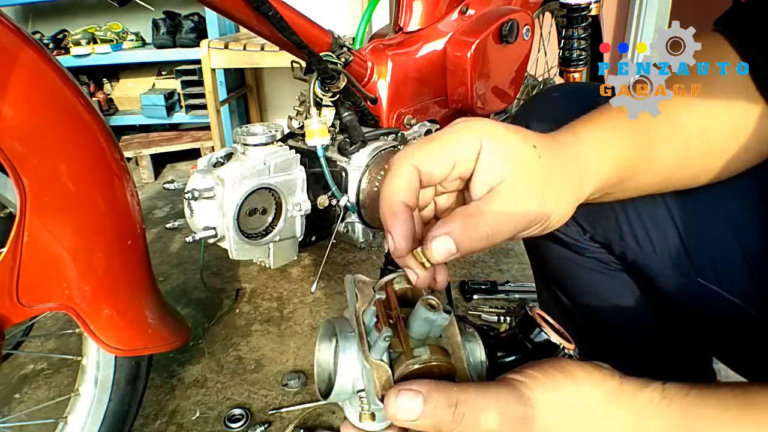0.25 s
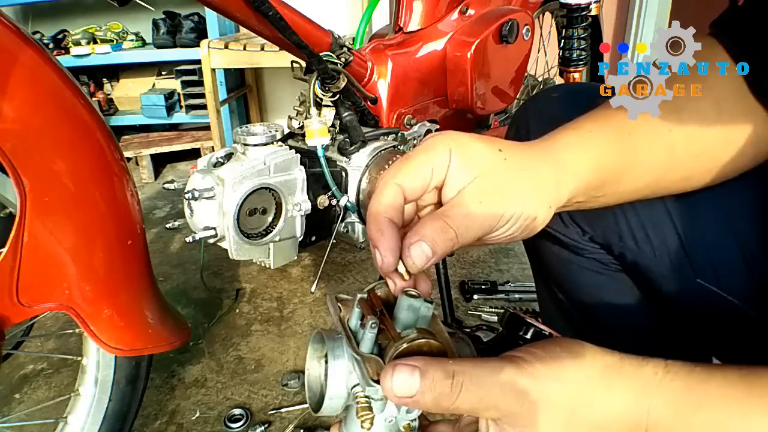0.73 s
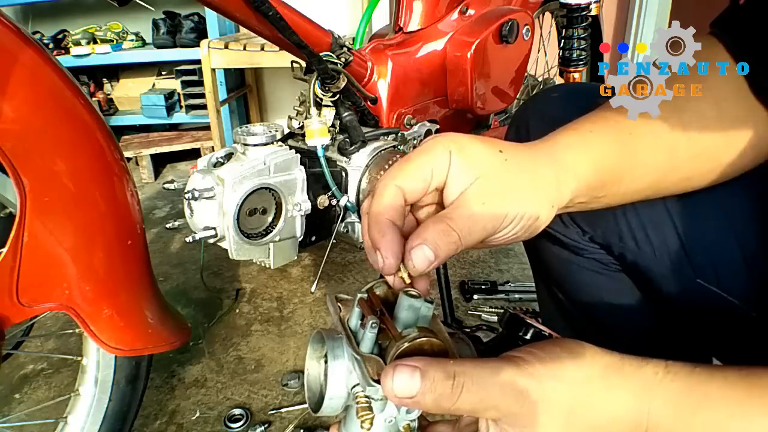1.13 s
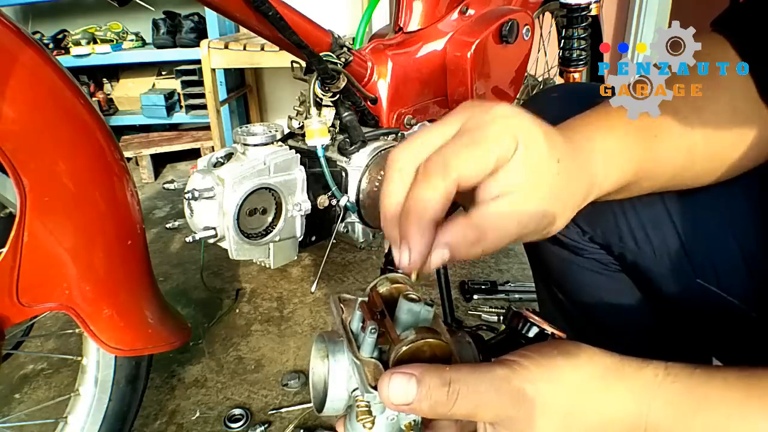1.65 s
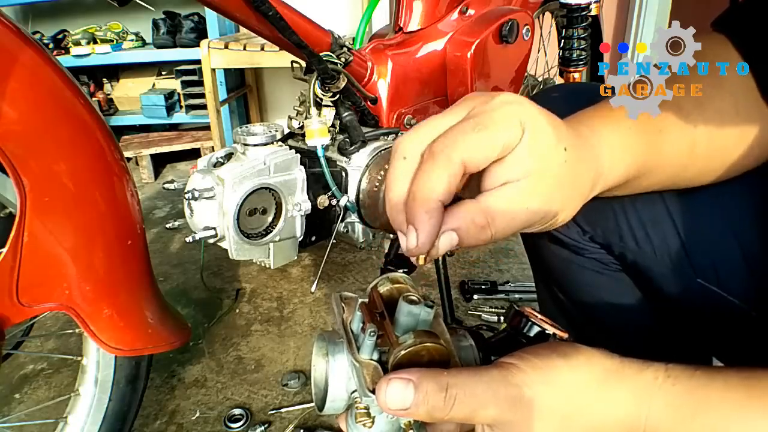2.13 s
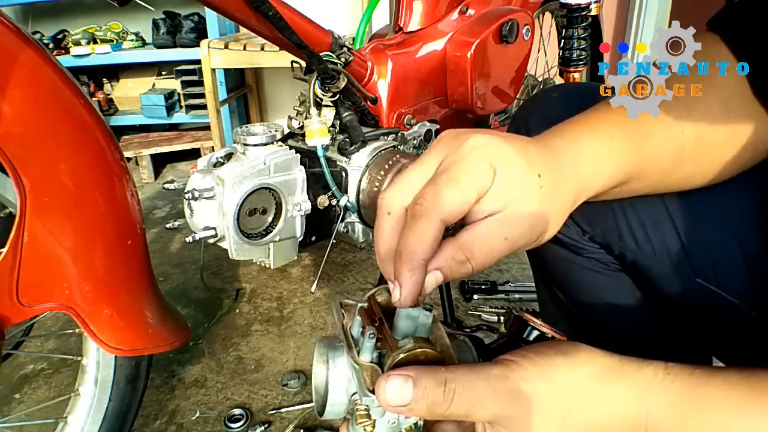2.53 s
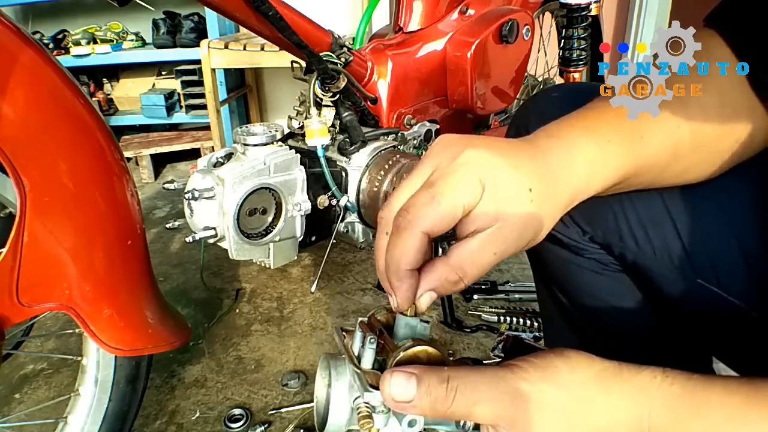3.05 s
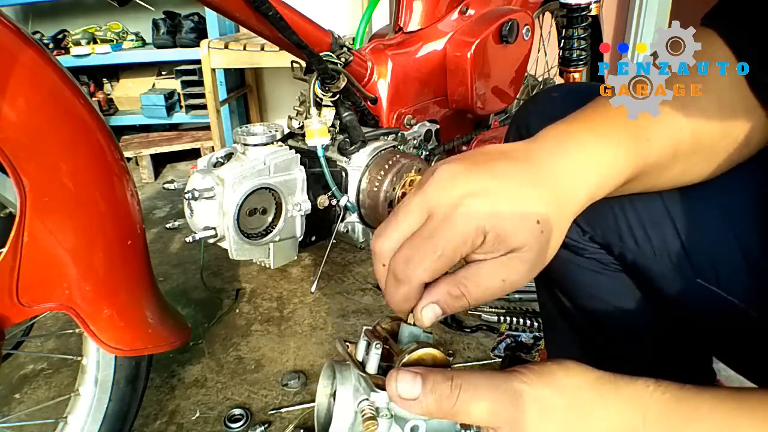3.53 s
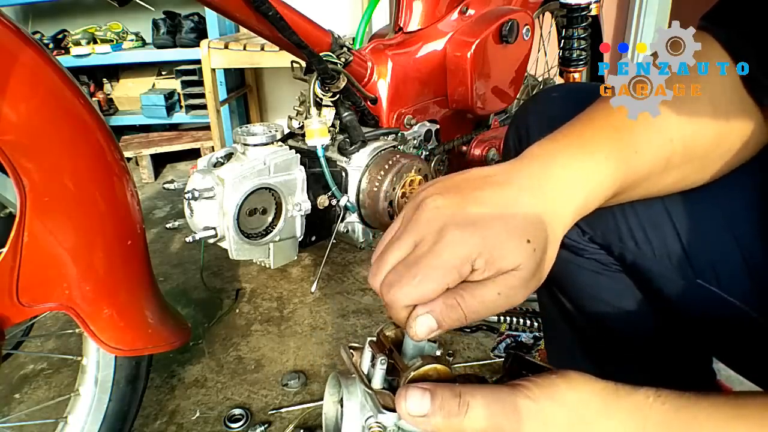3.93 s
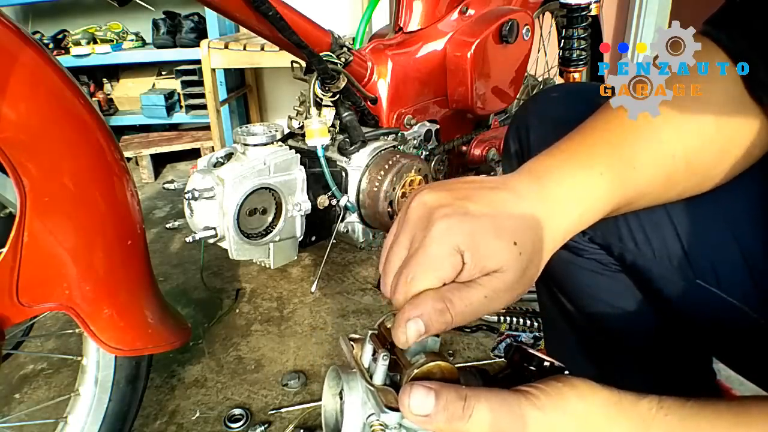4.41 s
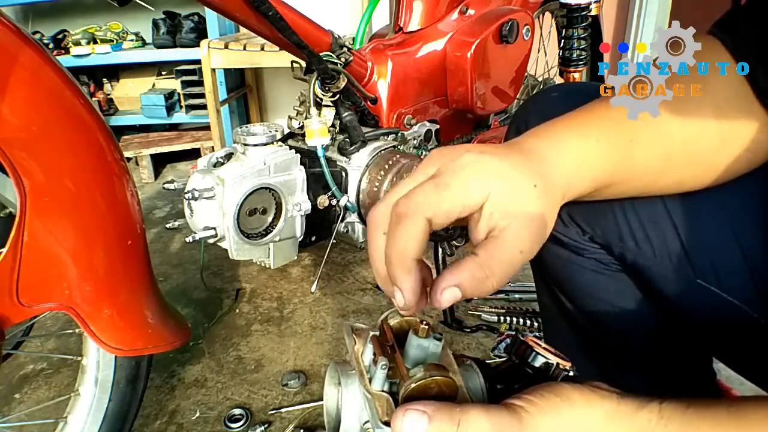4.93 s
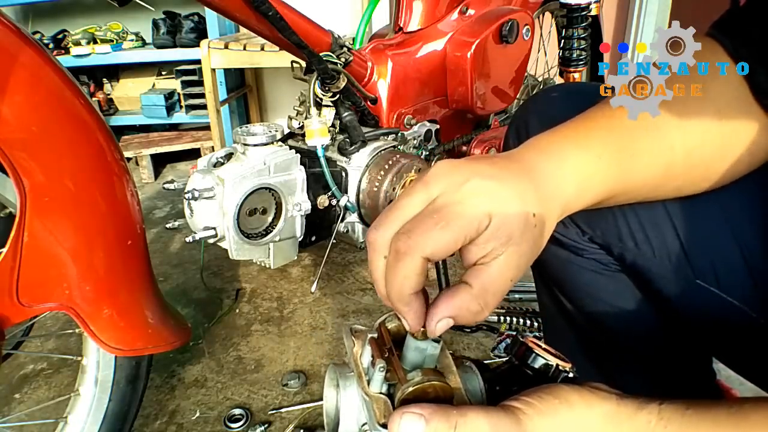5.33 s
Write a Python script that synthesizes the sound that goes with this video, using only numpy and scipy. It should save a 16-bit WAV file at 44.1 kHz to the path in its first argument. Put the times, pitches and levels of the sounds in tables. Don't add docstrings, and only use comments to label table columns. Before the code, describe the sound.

Hands fit small brass and alloy carburetor parts close to a phone in an open workshop. A far hollow clank and light taps begin, then a loud clip clink and rattle, a solid pin click and the hardest ringing clack. Later come sparse ticks and a quick light cluster. Traffic, low drones, a motor and sparrows lie behind, ducked after the first loud clink.

```python
import sys
import numpy as np
from scipy import signal
from scipy.fft import rfft, irfft, next_fast_len
from scipy.io import wavfile
from scipy.ndimage import uniform_filter1d, minimum_filter1d

SR = 44100
rng = np.random.default_rng(int(sys.argv[2]) if len(sys.argv) > 2 else 0)


def voltage_ratio(level):
    return 10 ** (np.asarray(level, float) / 20)


def unload_audio(sound):
    columns = np.transpose(np.atleast_2d(sound))
    steps = np.round(np.clip(columns, -1, 1) * 32767)
    wavfile.write(sys.argv[1], SR, steps.astype(np.int16))


N = 245181
T = np.arange(N) / SR

# (frequency [Hz], left minus right [dB])
PORT_TILT = [(2000, 7.5), (4000, -3.5), (7000, 3), (10000, -10), (12000, -8.5), (15000, 12)]


def unit(x):
    return x / np.sqrt(np.mean(x ** 2))


def on_log(table, hz):
    f, db = np.transpose(table)[:2]
    return np.interp(np.log(np.maximum(hz, 1)), np.log(f), db)


def coloured(table, size, like=0., lean=0.):
    fast = next_fast_len(size)
    hz = np.fft.rfftfreq(fast, 1 / SR)
    inside = (hz >= table[0][0]) & (hz <= table[-1][0])
    mid, left, right = rng.standard_normal((3, fast))
    like = np.clip(like, 0, 1)
    pair = np.sqrt(like) * mid + np.sqrt(1 - like) * np.array([left, right])
    tilt_db = lean * on_log(PORT_TILT, hz) * np.array([[.5], [-.5]])
    spectrum = rfft(pair) * voltage_ratio(on_log(table, hz) + tilt_db) * inside
    return unit(irfft(spectrum, fast)[:, :size])


def walk(rate_hz):
    k = int(SR / rate_hz)
    steps = np.repeat(rng.standard_normal(N // k + 1), k)
    return 1.3 * uniform_filter1d(uniform_filter1d(steps, k), k)[:N]


def wobble(hz, spread):
    return np.sqrt(2) * np.sin(2 * np.pi * np.cumsum(hz * (1 + spread)) / SR)


def crest(s, db, rise_db_per_s, fall_db_per_s):
    return voltage_ratio(db - np.where(T < s, rise_db_per_s * (s - T), fall_db_per_s * (T - s)))


def echo(x, t60_s, db, gap_s, treble_t60_s, thin_hz=100):
    t = T[:SR // 2]
    thin = signal.butter(1, thin_hz, "high", fs=SR, output="sos")
    noise = signal.sosfilt(thin, rng.standard_normal((2, len(t))))
    dull = signal.sosfilt(signal.butter(2, 9000, fs=SR, output="sos"), noise)
    tail = dull * voltage_ratio(-60 * t / t60_s) + (noise - dull) * voltage_ratio(-60 * t / treble_t60_s)
    tail *= np.clip(t / gap_s, 0, 1)
    tail *= voltage_ratio(db) / np.sqrt(np.sum(tail ** 2, axis=1, keepdims=True))
    return x + signal.fftconvolve(x, tail, axes=1)[:, :N]


def street():
    # (frequency [Hz], density [dB per Hz])
    rumble_spectrum = [(12, -52.5), (20, -21.5), (87, 4), (162, -5.5), (196, -2.5), (255, -10),
                       (285, -20.5), (400, -17), (520, -37), (880, -120)]
    # (frequency [Hz], density [dB per Hz])
    wash_spectrum = [(150, -35.5), (250, -15), (279, -6), (308, -8.5), (639, -15), (698, -14.5),
                     (3500, -28.5), (4550, -58), (7700, -120)]
    # (frequency [Hz], density [dB per Hz])
    air_spectrum = [(1180, -37.5), (2000, -10), (2690, -12), (3740, -1.5), (5440, 1.5), (7510, -3.5),
                    (8900, -1), (10000, -1), (11300, 1), (13900, -1), (16000, -14.5)]
    # (frequency [Hz], level over the rumble [dB])
    motor_orders = [(93, -7), (143, -9.5), (190, -11.5)]
    # (time [s], swell [dB])
    traffic = [(0, 0), (.12, 9.5), (.28, 6.5), (.48, 0), (.7, 0.5), (.93, 8.5), (1.18, -0.5), (1.39, -1),
               (1.51, 7.5), (1.6, 3), (1.9, -0.5), (2.1, -1.5), (3.0, 1), (3.76, 0), (3.98, 2.5), (4.35, 2),
               (4.7, 4.5), (5.1, 5.5), (5.56, 14.5)]
    rumble_db, wash_db, air_db = -48.5, -55.5, -61.5
    rumble_follows, air_follows = 0.4, 0.5
    duck_s, duck_db, duck_fall_s, air_fall_s = 1.535, -13.5, 0.035, 0.33
    motor_fade_db_per_s = 1.04
    lorry_s, lorry_db, lorry_db_per_s = 5.56, -43, 62

    swell_db = np.interp(T, *np.transpose(traffic))
    after_s = np.maximum(T - duck_s, 0)
    ducked_db = duck_db * np.minimum(after_s / duck_fall_s, 1)
    air_ducked_db = duck_db * np.minimum(after_s / air_fall_s, 1)
    idle = voltage_ratio(rumble_db + rumble_follows * swell_db + ducked_db - motor_fade_db_per_s * after_s)
    rumble = np.hypot(idle, crest(lorry_s, lorry_db, lorry_db_per_s, lorry_db_per_s))
    motor = sum(voltage_ratio(db + 3. * walk(11)) * wobble(hz + 0 * T, 0.025 * walk(9)) for hz, db in motor_orders)
    low = coloured(rumble_spectrum, N, like=0.96) * voltage_ratio(1.4 * walk(11)) + motor
    wash = coloured(wash_spectrum, N, like=0.24) * voltage_ratio(1.3 * walk(11))
    air = coloured(air_spectrum, N, like=0.074) * voltage_ratio(0.73 * walk(5.7))
    wash_gain = voltage_ratio(wash_db + swell_db + ducked_db)
    air_gain = voltage_ratio(air_db + air_follows * swell_db + air_ducked_db)
    return rumble * low + wash_gain * wash + air_gain * air


def drones():
    # (start [s], end [s], pitch [Hz], level [dB])
    passes = [
        (0, 1.385, 421, -59),
        (0, 1.2, 566, -65),
        (0.19, 0.594, 522.5, -62.5),
        (3.376, 3.848, 277.7, -70),
        (4.94, 5.271, 309.7, -66.5),
        (5.045, 5.605, 468.5, -72.5),
        (5.319, 5.599, 983, -73),
        (4.021, 4.145, 750, -77),
    ]
    fade_s = 0.063
    out, swell_db, drift = 0, 4.44 * walk(24.04), 0.01547 * walk(30)
    for start, end, hz, db in passes:
        gate = np.clip(np.minimum(T - start, end - T) / fade_s, 0, 1)
        lag = rng.integers(N)
        out = out + gate * voltage_ratio(db + np.roll(swell_db, lag)) * wobble(hz + 0 * T, np.roll(drift, lag))
    return out


def clank():
    # (time [s], pitch [Hz], level [dB])
    knock_table = [
        (0, 1022, -29),
        (0.082, 1006, -40),
        (0.206, 934, -33.5),
        (0.381, 858, -48.5),
        (0.494, 890, -46),
    ]
    rise_db_per_s, fall_db_per_s = 302, 409
    shake = 0.038 * walk(330)
    knocks = sum(crest(s, db, rise_db_per_s, fall_db_per_s) * wobble(hz + 0 * T, shake)
                 for s, hz, db in knock_table)
    return knocks * voltage_ratio(0.9 * walk(70.0) - 5.5) * voltage_ratio(np.array([[-1.5], [1.5]]))


def contacts(hits, modes, crack, scatter_db, crack_db, low_db, low_hz):
    out, t = np.zeros((2, N + SR)), T[:SR // 5]
    fine_t60_s, fine_db = .12, -26
    ring_freedom = 0.95

    fine_hz = np.linspace(2300, 9000, num=36) + rng.uniform(-80, 80, size=36)
    fine = np.transpose([fine_hz, fine_db + on_log(crack, fine_hz), fine_t60_s + 0 * fine_hz])
    hz, db, t60_s = np.vstack([modes, fine]).T
    probe = np.exp(-2j * np.pi * hz[:, None] * t[:SR // 10])
    lag = rng.uniform(.5, .95, (len(hz), 1)) * np.clip(hz / 4000, 0, 1.1)[:, None]
    turn = np.array([-1, 1])[:, None, None] * lag
    decay = voltage_ratio(-60 * t / np.clip(t60_s, .03, .3)[:, None])
    rings = np.exp(1j * (2 * np.pi * hz[:, None] * t + turn)) * decay
    lean_db = on_log(PORT_TILT, hz) * np.array([[.5], [-.5]])
    low_half = signal.butter(8, 5000, fs=SR, output="sos")
    high_half = signal.butter(8, 5000, "high", fs=SR, output="sos")
    touch = np.sin(np.pi / 2 * np.minimum(t / .0008, 1)) ** 2

    for s, peak_db, pan_db, rel_db, chatter_ms, grip_s in hits:
        i = int(s * SR)
        x = t[:SR // 10] * 1000 / max(chatter_ms, .3)
        swell = x ** 0.47 * np.exp(-x)
        impacts = swell * rng.standard_normal(len(x)) * rng.exponential(size=len(x)) ** 1.6
        push = probe @ impacts / np.linalg.norm(impacts)
        even = np.exp(1j * (2 * np.pi * hz * i / SR - np.angle(push))) / np.clip(np.abs(push), .3, 3)
        mix_db = db + scatter_db * rng.standard_normal((2, len(hz))) + (hz < low_hz) * (rel_db + low_db)
        clear = ((voltage_ratio(mix_db + lean_db) * even)[:, None] @ rings)[:, 0].imag
        clear = clear / np.sqrt(np.sum(voltage_ratio(2 * db))) * voltage_ratio(-60 * ring_freedom * t / grip_s)
        thud = signal.sosfilt(low_half, coloured(crack, len(t), like=0.076, lean=0.91))
        fizz = signal.sosfilt(high_half, coloured(crack, len(t), like=0.076, lean=0.91))
        thud_gain = voltage_ratio(min(rel_db + low_db, 0) + 11.0 - 60 * t / 0.016)
        dense = thud_gain * thud + voltage_ratio(-60 * t / 0.065) * fizz
        body = (clear + voltage_ratio(crack_db - 60 * t / grip_s) * dense) * touch
        sound = signal.fftconvolve(body, impacts[None], axes=1)[:, :len(t)]
        sound *= voltage_ratio(peak_db) / np.abs(sound.mean(axis=0)).max()
        out[:, i:i + len(t)] += sound * voltage_ratio(np.array([[pan_db], [-pan_db]]) / 2)
    return out[:, :N]


def light_taps():
    # (time [s], peak [dB], left minus right [dB], low ring minus peak [dB], chatter [ms])
    lift_taps = [
        (.102, -36.5, 6, -8, 14),
        (.131, -29.5, 0.5, -13, 9.5),
        (.180, -27, 8, 1.5, 3.7),
        (.196, -33, 3, 8, 7.5),
        (.311, -49, 8, 22, 1.46),
        (.357, -31.5, 10, -6, 5),
        (.424, -44.5, 14, -22, 5.1),
        (.598, -53.5, -18.5, -15, 27),
        (.912, -42.5, 0, -30, 25),
    ]
    # (time [s], peak [dB], left minus right [dB], low ring minus peak [dB], chatter [ms])
    turn_taps = [(1.883, -30, 3, -40, 1.5), (2.06, -60.5, -1, -29, 8), (2.70, -47, -1, -18.5, 10.6),
                 (3.338, -54, -2, -25, 3), (3.346, -43, 8.5, -19, 2.24), (3.354, -38, -2, -16, 10.6),
                 (3.381, -29, 4, -17, 1.45), (3.39, -45.5, 3, -7.5, 20), (3.82, -57.5, 6, -30, 15.7),
                 (4.156, -53.5, -15.5, -16, 2.6), (4.283, -56, 13, -26, 1.16), (4.302, -57.5, 6, -26, 1.4),
                 (4.368, -32, 5, -22, 1.34), (4.392, -40, 6, -19, 10.8)]
    # (time [s], peak [dB], left minus right [dB], low ring minus peak [dB], chatter [ms])
    press_taps = [(4.597, -39, -10.5, -20, 1.5), (4.589, -50, 0, -5, 2.95), (4.605, -41, 4, -15.5, 2.5),
                  (4.625, -51, 8, -26.5, 19), (4.695, -36, -6, -12, 1.4), (4.701, -37, -3, -13.5, 2),
                  (4.719, -35, 8, -20, 2.2), (4.744, -35, 1, -23, 10.5), (4.776, -25.5, 6, -24, 1.8),
                  (4.780, -32, 2, -8, 2.8), (4.784, -26.5, -7.5, -47, 0.48), (4.787, -42, 8.5, 2.5, 9.7),
                  (4.796, -30.5, 3, -3, 2.2), (5.019, -43.5, -1, -15.5, 4.1), (5.200, -42.5, -4, -8, 4.7),
                  (5.221, -38, 1, -9.5, 1.75), (5.335, -44, -7, -27, 1.7), (5.529, -47.5, -5, -18, 1.9)]
    # (frequency [Hz], level [dB], t60 [s])
    tap_modes = [(2720, -12, 0.14), (2600, -18, 0.073), (5370, -5, 0.033), (5840, -10, 0.04),
                 (6300, -13, 0.039), (6970, -0.5, 0.047), (7680, -2.5, 0.093), (9800, -11, 0.055),
                 (10660, -3, 0.06), (11170, 2.5, 0.066), (12300, 5.5, 0.061), (12000, -11, 0.089),
                 (13200, 1.5, .07), (14750, -3, .06), (14640, -9, 0.05), (15560, -5, 0.058)]
    # (frequency [Hz], density [dB per Hz])
    tap_crack = [(1470, -31.5), (2500, -26), (3380, -15), (4690, -26.5), (5230, -12), (8900, -9),
                 (9900, -1), (13000, 1.5), (16000, -14.5)]
    lift_grip_s, turn_grip_s, press_grip_s = 0.073, 0.053, 0.34
    grip_loss = 0.11

    hits = []
    for taps, grip_s in ((lift_taps, lift_grip_s), (turn_taps, turn_grip_s), (press_taps, press_grip_s)):
        for tap in taps:
            hits.append((*tap, grip_s * voltage_ratio(-grip_loss * max(tap[3] + 5, 0))))
    return contacts(hits, tap_modes, tap_crack, scatter_db=5.5, crack_db=6.0, low_db=18.0, low_hz=3000)


def with_chatter(hits, chatter_ms):
    return [(*hit, chatter_ms, grip_s) for *hit, grip_s in hits]


def spring_clip():
    # (time [s], peak [dB], left minus right [dB], low ring minus peak [dB], finger-held ring time [s])
    clip_hits = [
        (1.534, -23.5, -0.5, -22, 0.031),
        (1.538, -5.5, 1, -34.5, 0.032),
        (1.5435, -11.5, 1, -24.5, 0.026),
        (1.551, -28.5, 5, 11.5, 0.22),
        (1.575, -17.5, 4.5, -16, .11),
        (1.590, -17, 5.5, -20.5, .13),
        (1.609, -21, -3.5, -22, 0.21),
        (1.624, -30.5, 1.5, -9, .3),
    ]
    # (frequency [Hz], level [dB], t60 [s])
    clip_modes = [(2620, -15.5, 0.13), (5680, -18, 0.11), (5658, -14.5, 0.34), (5730, -18, 0.15),
                  (7000, -13.5, 0.054), (7860, -9, 0.06), (9620, -10, 0.081), (10400, -3.5, .12),
                  (10300, -3, .15), (11550, 2, 0.07), (12100, -13, .1), (12760, -4.5, .1),
                  (14160, -12.5, .12), (14610, 1, 0.11), (2700, -15.5, .1)]
    # (frequency [Hz], density [dB per Hz])
    clip_crack = [(880, -80), (1500, -55.5), (2640, -17), (4780, -24.5), (5490, -17.5), (8490, -11.5),
                  (11300, 1.5), (15100, -5), (16000, -6.5)]
    return contacts(with_chatter(clip_hits, 0.87), clip_modes, clip_crack,
                    scatter_db=2.5, crack_db=6.5, low_db=10.5, low_hz=3000)


def pin():
    # (time [s], peak [dB], left minus right [dB], low ring minus peak [dB], finger-held ring time [s])
    pin_hits = [
        (1.755, -17, 3, -6.5, 0.12),
        (1.759, -12.5, 2, -8.5, 0.086),
        (1.764, -2, 1, -15, 0.022),
        (1.769, -6, 2, -11, 0.059),
        (1.774, -8, -1, -20, 0.017),
        (1.779, -16.5, 0.5, -5.5, .15),
        (1.783, -18.5, 1, -7, 0.16),
        (1.857, -35, 1, -33, 0.042),
    ]
    # (frequency [Hz], level [dB], t60 [s])
    pin_modes = [(2510, -11, .08), (2594, -4, .1), (2650, -10, .1), (2710, -5, .1), (2800, -14, .08),
                 (2950, -18, .1), (3268, -20, .1), (4242, -15, .11), (5000, -14, .1), (5402, -9, .12),
                 (5760, -9, .15), (7058, -13, .12), (7842, -10, .15), (8060, -15, .15), (14560, -4, .1),
                 (3644, -6, 0.11), (3941, -5, 0.1), (5356, -6, 0.1), (5670, -12, 0.2), (6465, -11, 0.19),
                 (7639, -8, 0.16), (8721, -11, 0.14), (9539, -14, 0.17), (10240, -5, 0.16),
                 (11210, -10, 0.2), (11500, -5, 0.15), (11880, 0, 0.1), (12130, -9, 0.18),
                 (12510, -5, 0.13), (12770, -12, 0.15), (12900, -10, 0.17), (13020, -8, 0.15),
                 (13290, -21, 0.63), (13750, -22, 0.19), (14000, -1, .12)]
    # (frequency [Hz], density [dB per Hz])
    pin_crack = [(470, -74.5), (800, -34.5), (2630, -16), (4030, -19), (4460, -35.5), (4680, -20),
                 (5580, -2), (7260, -6), (14300, -1), (16000, -17.5)]
    return contacts(with_chatter(pin_hits, 2), pin_modes, pin_crack,
                    scatter_db=0.0, crack_db=5.0, low_db=4.5, low_hz=4500)


def bowl():
    # (time [s], peak [dB], left minus right [dB], low ring minus peak [dB], finger-held ring time [s])
    bowl_hits = [
        (2.320, -21, 0.45, -4.5, 0.12),
        (2.3235, -9.5, 1, -10, .08),
        (2.3268, 0.5, 0.87, -12, .04),
        (2.3325, -2, 1, -1, .17),
        (2.338, -7.5, 1, -1.5, 0.15),
        (2.344, -14.5, 1.8, -0.5, 0.24),
        (2.348, -11.5, 2.1, -7, 0.16),
    ]
    # (frequency [Hz], level [dB], t60 [s])
    bowl_modes = [(2520, -18, .08), (2590, -9, .11), (2636, -12, .11), (2669, -12, .1), (2790, -15, .1),
                  (2900, -21, .1), (3030, -23, .1), (3938, -15, .16), (4040, -20, .12), (4310, -22, .12),
                  (4720, -27, .15), (5657, -26, .15), (5804, -26, .15), (5880, -25, .15), (6330, -31, .2),
                  (2713, -4, 0.09), (3661, -22, 0.12), (4113, -11, 0.13), (4226, -11, 0.18),
                  (5405, -29, 0.15), (5763, -25, 0.17), (6250, -27, 0.22), (7171, -30, 0.3),
                  (7461, -29, .23), (7655, -30, .3), (7881, -28, 0.19), (8059, -30, 0.23),
                  (8452, -31, 0.21), (9275, -33, 0.27), (9561, -31, 0.18), (9857, -25, 0.16),
                  (10070, -14, 0.11), (10340, -27, 0.2), (10480, -14, 0.11), (11160, -13, .12),
                  (11340, -7, 0.16), (11610, -16, 0.12), (11710, -20, 0.15), (12410, -34, 0.26),
                  (13250, -20, 0.14), (13970, -1, 0.08), (14570, -12, .08), (15290, -15, 0.12)]
    # (frequency [Hz], density [dB per Hz])
    bowl_crack = [(300, -59), (620, -18.5), (1100, -25.5), (2350, -17), (2670, -6.5), (3200, -26),
                  (4100, -5.5), (4600, -20.5), (5100, -32.5), (5450, -2.5), (6400, -8), (6700, -23.5),
                  (7000, -7.5), (8900, -10.5), (14100, -10), (16000, -15)]
    return contacts(with_chatter(bowl_hits, 0.9), bowl_modes, bowl_crack,
                    scatter_db=3.5, crack_db=3.5, low_db=1.0, low_hz=4500)


def sparrows():
    # (time [s], length [s], start pitch [Hz], end pitch [Hz], level [dB])
    chirps = [
        (0.586, 0.11, 6240, 6160, -61.5),
        (0.83, 0.16, 5315, 4020, -44),
        (0.947, 0.18, 5280, 4660, -62),
        (2.267, 0.082, 4800, 4400, -63),
        (3.946, 0.19, 5100, 4030, -61),
        (5.029, 0.13, 4500, 3540, -65.5),
    ]
    out, shake, rasp = np.zeros(N), np.tanh(0.83 * walk(1300)), voltage_ratio(1.5 * walk(700))
    for s, length_s, start_hz, end_hz, db in chirps:
        u = np.clip((T - s) / length_s, 0, 1)
        hz = start_hz + (end_hz - start_hz) * np.minimum(2.7 * u, 1)
        voice = wobble(hz, 0.27 * shake)
        voice += voltage_ratio(-12.5) * wobble(1.5 * hz, 0.08 * shake)
        voice += voltage_ratio(-24.5) * wobble(2.2 * hz, 0.19 * shake)
        voice += voltage_ratio(-25.0) * wobble(3 * hz, .15 * shake)
        out += voltage_ratio(db) * np.sin(np.pi * u ** 0.63) ** 1.6 * rasp * voice
    throat = signal.butter(6, 2900, "high", fs=SR, output="sos")
    return signal.sosfilt(throat, out) * voltage_ratio(np.array([[-1.5], [1.5]]))


def thumps():
    # (time [s], level [dB], pitch [Hz], t60 [s])
    knocks = [
        (1.801, -49.5, 66, .3),
        (2.328, -44, 80, 0.13),
    ]
    out = 0
    for s, db, hz, t60_s in knocks:
        after_s = np.maximum(T - s, 0)
        out = out + voltage_ratio(db - 60 * after_s / t60_s) * np.sin(2 * np.pi * hz * after_s)
    return out


def insect():
    # (frequency [Hz], density [dB per Hz])
    wing_spectrum = [(8000, -22), (9200, -26), (9550, -1), (10500, -2), (11300, -1), (11800, 1),
                     (12150, -1), (12350, -30), (12900, -28), (13200, -19), (15400, -28)]
    # (start [s], end [s], wing hiss [dB], whistle [dB], first whistle pitch [Hz])
    phrases = [
        (2.255, 3.25, -64, -77, 8070),
        (3.8, 4.27, -64, -82, 8140),
        (4.566, 5.8, -64.5, -76, 8750),
    ]
    # (time [s], wing hiss [dB], whistle [dB])
    surges = [
        (2.9, -62.5, -75),
        (4.01, -87, -61.5),
        (4.81, -70, -51.5),
        (5.5, -57.5, -80),
    ]
    hiss_db_per_s, whistle_db_per_s = 81.5, 134
    attack_s, release_s = 0.081, 0.16
    settled_hz, sink_s = 7050, .27

    hiss = coloured(wing_spectrum, N, like=0.32) * voltage_ratio(2.0 * walk(220))
    out, shake, rasp = 0, .028 * walk(1100), voltage_ratio(3. * walk(300))
    wings = sum(crest(s, db, hiss_db_per_s, hiss_db_per_s) for s, db, _ in surges)
    blow = sum(crest(s, db, whistle_db_per_s, whistle_db_per_s) for s, _, db in surges)
    for start, end, hiss_db, whistle_db, first_hz in phrases:
        gate = np.clip(np.minimum((T - start) / attack_s, (end - T) / release_s), 0, 1)
        hz = settled_hz + (first_hz - settled_hz) * np.exp(-np.maximum(T - start, 0) / sink_s)
        whistle = (voltage_ratio(whistle_db) + blow) * rasp * wobble(hz, shake)
        out = out + gate * ((voltage_ratio(hiss_db) + wings) * hiss + whistle)
    return out * voltage_ratio(np.array([[-2.5], [2.5]]))


def near_dips():
    # (time [s], loss [dB], time to recover [s])
    level_dips = [
        (1.551, -10, .03),
        (1.889, -7, 0.17),
    ]
    loss_db = 0
    for s, db, recover_s in level_dips:
        onset = np.clip((T - s) / 0.0037, 0, 1)
        loss_db = loss_db + db * onset * np.exp(-np.maximum(T - s, 0) / recover_s)
    return voltage_ratio(loss_db)


def scene():
    far = echo(sparrows() + clank(), t60_s=0.1, db=4.5, gap_s=0.0059, treble_t60_s=0.1)
    parts = light_taps() + spring_clip() + pin() + bowl()
    near = echo(parts, t60_s=0.24, db=-8.5, gap_s=0.0059, treble_t60_s=0.19, thin_hz=3500)
    return near * near_dips() + thumps() + far + insect() + drones() + street()


def band_limit(x):
    return signal.sosfilt(signal.butter(12, 16170, fs=SR, output="sos"), x)


def record(dry):
    top_hz, ceiling = 15760, 1.08
    cut = signal.sosfilt(signal.ellip(8, .2, 70, top_hz, fs=SR, output="sos"), dry)
    room = np.minimum(ceiling / (np.abs(cut).max(axis=0) + 1e-9), 1)
    limited = cut * uniform_filter1d(minimum_filter1d(room, size=61), size=41)
    return band_limit(limited)


dry = scene()
out = record(dry)
unload_audio(out)
```